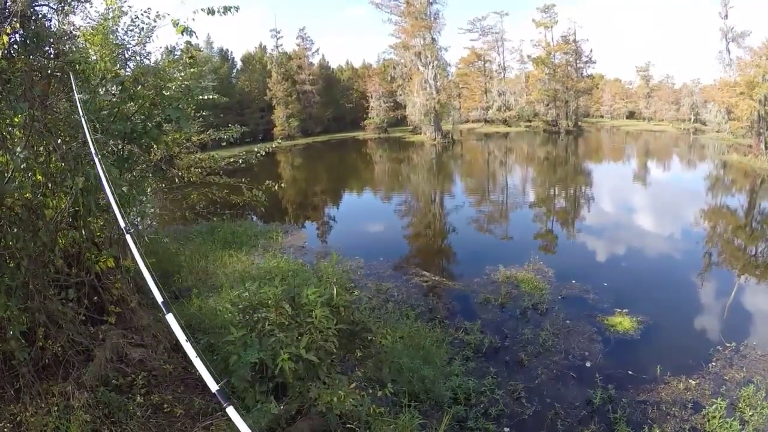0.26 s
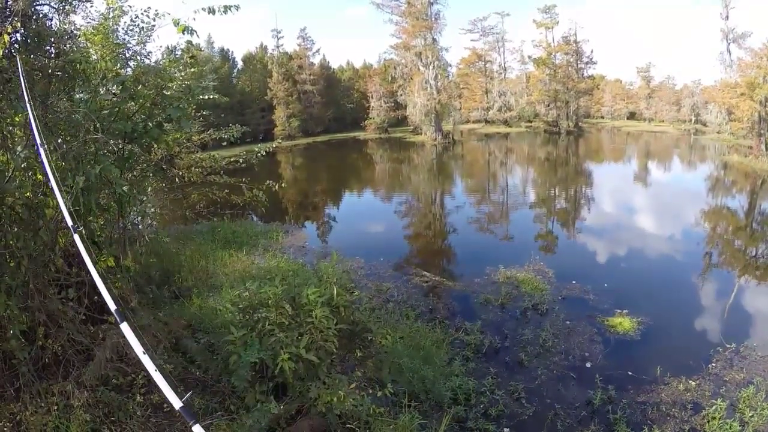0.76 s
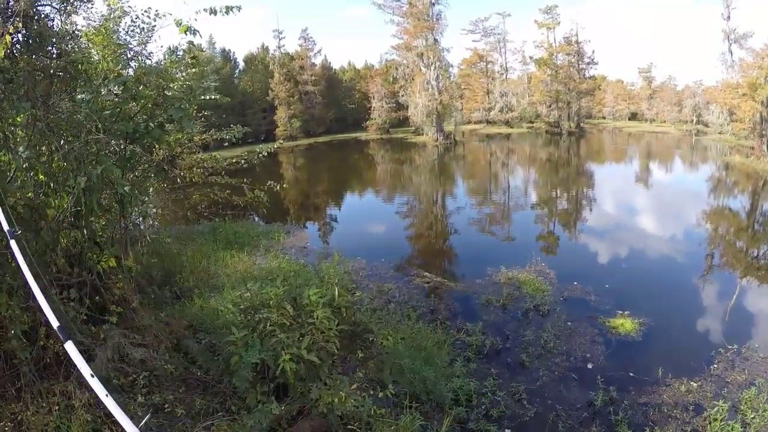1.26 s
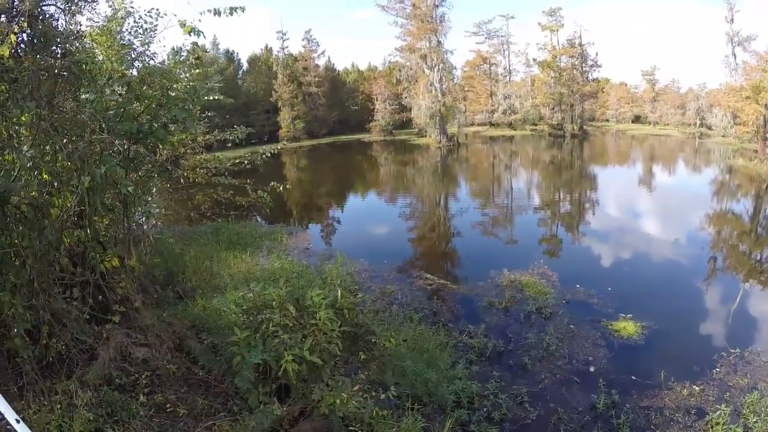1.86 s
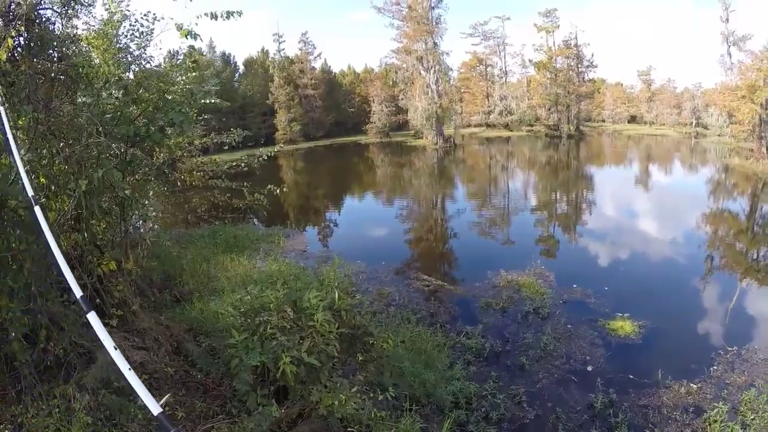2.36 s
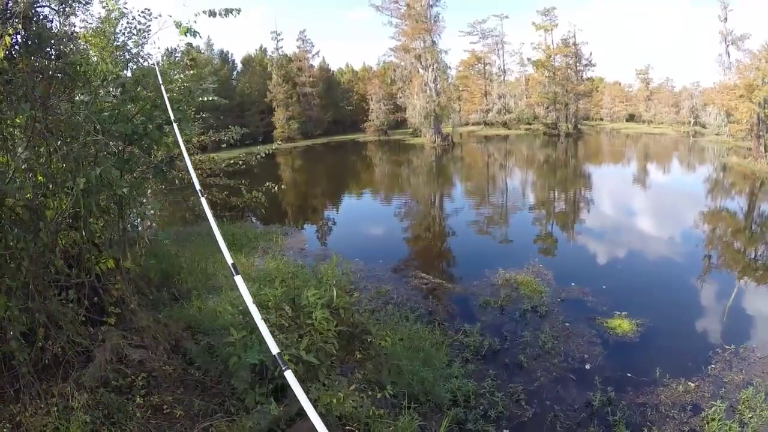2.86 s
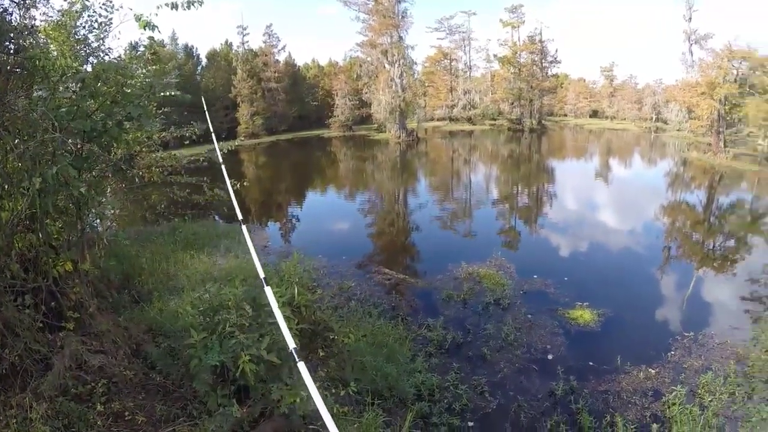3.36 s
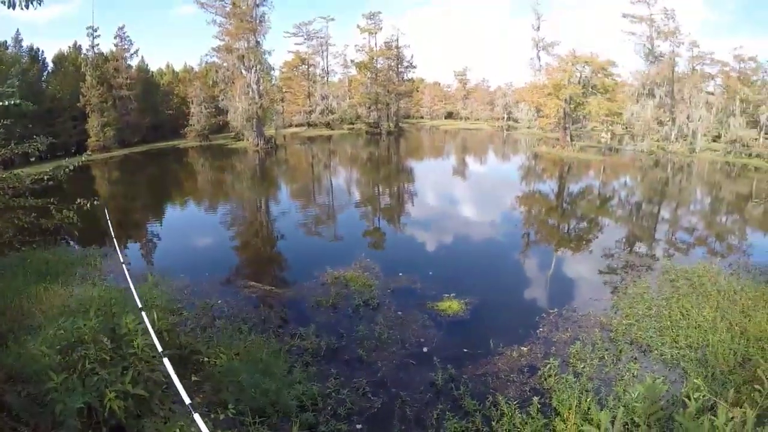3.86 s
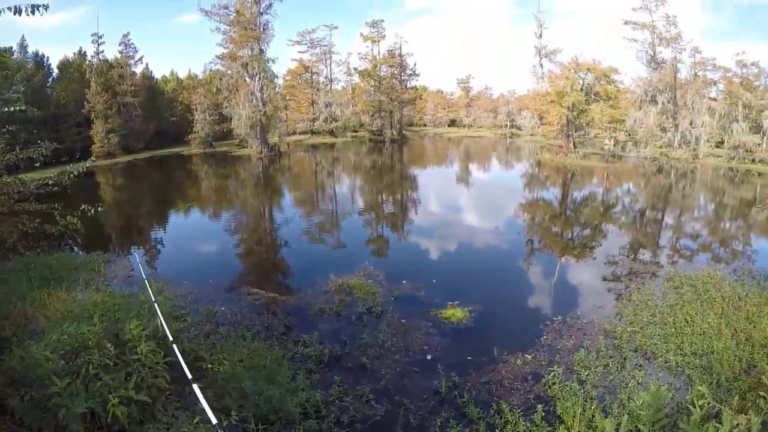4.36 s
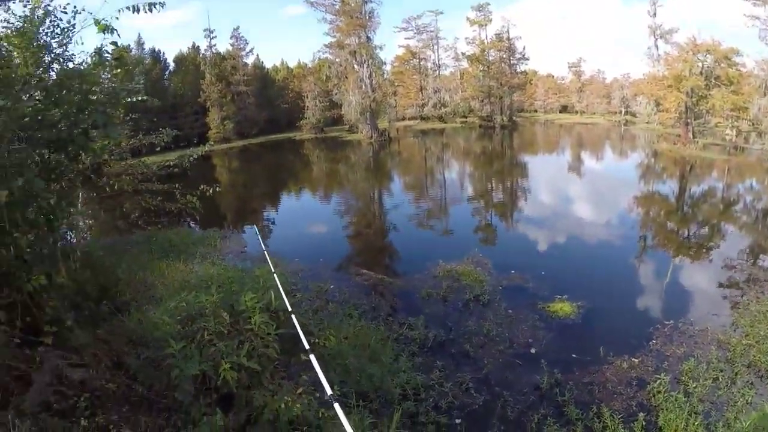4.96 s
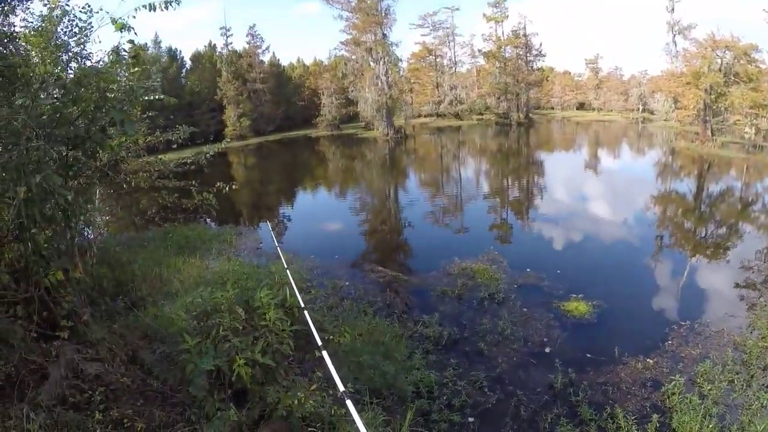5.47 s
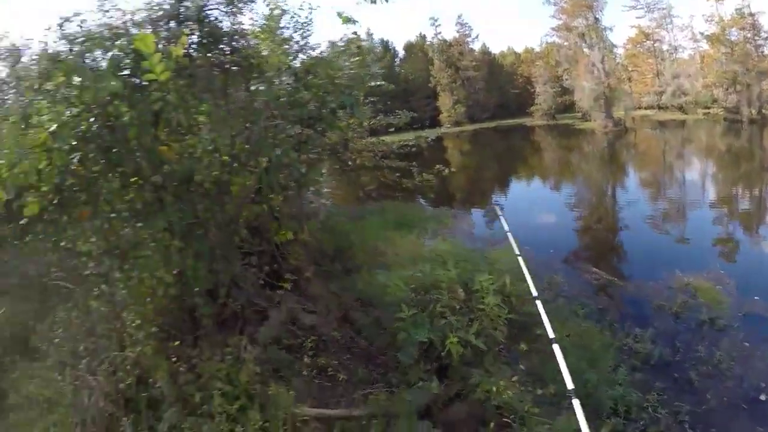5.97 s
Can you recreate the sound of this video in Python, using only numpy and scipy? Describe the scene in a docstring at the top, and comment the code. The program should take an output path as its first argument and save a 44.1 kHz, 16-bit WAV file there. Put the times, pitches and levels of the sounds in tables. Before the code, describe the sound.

Faint, high cricket chirps pulse beside a quiet pond, along with a katydid's thin rasp and a few far bird notes, over steady low rumble and a distant machine hum. Midway, small creaks lead to a sharp, dull knock right at the microphone as an angler's gear bumps it. The insects carry on, and a second, lighter bump comes at the end with a plastic click and a brush of cloth.

```python
"""Low air rumble and a far machine's drone hang over the edge of a still pond.
Crickets chirp in the grass, each chirp a quick run of wing strokes. A meadow katydid rasps its wings
in a high buzz, ticks, then buzzes again, and a far bird's thin notes echo from the trees.
Twice, loud and close, an angler's gear knocks and rubs on the camera case as the rod is swung round."""
import sys
import numpy as np
from scipy import signal
from scipy.fft import rfft, irfft, next_fast_len
from scipy.io import wavfile
from scipy.ndimage import map_coordinates

SR = 44100
rng = np.random.default_rng(int(sys.argv[2]) if len(sys.argv) > 2 else 0)


def unload_audio(sound):
    """Save the sound as a 16-bit wav file, at the path given as the first command line argument."""
    columns = np.transpose(np.atleast_2d(sound))
    # keep every value between -1 and 1, then stretch to whole-number steps
    steps = np.round(np.clip(columns, -1, 1) * 32767)
    wavfile.write(sys.argv[1], SR, steps.astype(np.int16))


N = 273420

# boxy tone of the camera case, knocked or scuffed: (frequency [Hz], relative level [dB])
CASE_COLOUR = [(40, -27), (150, -1.5), (250, -7.5), (350, -0.5), (560, -4), (740, -4.5), (980, -4.5),
               (1250, -11.5), (1500, -5.5), (1750, -9.5), (2200, -27.5), (2800, -20), (3800, -29.5),
               (5400, -30.5), (6300, -59)]


def amp(db):
    """Decibels to gain."""
    return 10 ** (np.asarray(db) / 20)


def unit(x):
    """Scale to rms 1."""
    return x / np.sqrt(np.mean(x ** 2) + 1e-20)


def along(points, hz):
    """Read a curve of (Hz, value) points along a log frequency axis."""
    freqs, values = np.transpose(points)
    return np.interp(np.log(hz + 1), np.log(freqs + 1), values)


def wobble(rate):
    """A smooth random curve, rate knots a second."""
    return map_coordinates(rng.standard_normal(int(N * rate / SR) + 4), [np.arange(N) * rate / SR])


def humps(rows):
    """A gain envelope of bell-shaped swells: (crest [s], spread [s], level [dB])."""
    t = np.arange(N) / SR
    return sum(amp(db) * np.exp(-.5 * ((t - s) / spread) ** 2) for s, spread, db in rows)


def filtered(x, response):
    """Equalise x with a gain given as a function of frequency."""
    size = next_fast_len(N + SR // 2)
    return irfft(rfft(x, size) * response(np.fft.rfftfreq(size, 1 / SR)), size)[:N]


def noise(spectrum):
    """Coloured noise of rms 1."""
    return unit(filtered(rng.standard_normal(N), lambda hz: amp(along(spectrum, hz))))


def causal(gain):
    """The most compact impulse response that has this gain."""
    cepstrum = irfft(np.log(np.maximum(gain, 1e-6)))
    half = len(cepstrum) // 2
    cepstrum[1:half] *= 2
    cepstrum[half + 1:] = 0
    return irfft(np.exp(rfft(cepstrum)))


def add(track, s, sound):
    """Mix a sound in at time s."""
    part = track[max(round(s * SR), 0):][:len(sound)]
    part += sound[:len(part)]


def glide(length, start_hz, end_hz):
    """A tone that swells and fades while its pitch slides."""
    u = np.linspace(0, 1, int(length * SR))
    return np.sin(np.pi * u) * np.sin(2 * np.pi * np.cumsum(start_hz + (end_hz - start_hz) * u) / SR)


def mode(t, hz, db, t60, attack_s=0.0004):
    """One damped resonance, set going by a contact of finite length."""
    return amp(db - 60 * t / t60) * (1 - np.exp(-t / attack_s)) * np.sin(2 * np.pi * hz * t)


def trees(x, t60, wet_db):
    """The sound with its diffuse echo from the trees."""
    t = np.arange(SR) / SR
    tail = rng.standard_normal(SR) * amp(-60 * t / t60)
    return x + amp(wet_db) * signal.fftconvolve(x, tail / np.linalg.norm(tail))[:N]


def air(rumble_db=-40.7, wash_db=-50, swell_rest_db=-75.5, hiss_db=-68.5):
    """The bed: low rumble, a distant wash over the water that swells a little, and a fine even hiss."""
    # tone of each layer: (frequency [Hz], relative level [dB])
    rumble_colour = [(8, -20), (20, -9.5), (32, 2), (48, -2.5), (75, -2.5), (105, -8.5), (140, -19),
                     (220, -32.5), (400, -67)]
    wash_colour = [(100, 1), (220, -1.5), (400, -6), (520, -6), (660, 1.5), (780, 1), (920, -6.5),
                   (1100, -13), (1280, -18), (1600, -20.5), (2100, -27.5), (3500, -35.5), (7000, -66)]
    swell_colour = [(600, -15), (950, -1), (1150, 0.5), (1500, -9), (2200, -21.5), (4000, -51)]
    hiss_colour = [(800, -4), (2500, 1.5), (4800, 0.5), (7000, -3), (9500, -6.5), (12000, -7), (15000, -10)]
    # swells in the wash's upper range: (crest [s], spread [s], level [dB])
    swells = [(.8, 1.02, -64.5), (4.8, .2, -72)]
    rumble = amp(rumble_db + .5 * wobble(6)) * noise(rumble_colour)
    wash = amp(wash_db + 0.65 * wobble(5.6)) * noise(wash_colour)
    swell = np.hypot(amp(swell_rest_db), humps(swells)) * noise(swell_colour)
    return rumble + wash + swell + amp(hiss_db) * noise(hiss_colour)


def machine(shaft_hz=45.95, drift=0.00199, fading_db=3.0, burr_db=-53.5, surge_db=4.5):
    """Far shaft harmonics fade and shift on their way through the air; a low burr surges once."""
    # tones of the drone: (multiple of the shaft speed, rms level [dB])
    harmonics = [(10, -73.5), (12, -67.5), (14, -62), (16, -61), (18, -61), (19, -68), (24, -75.5)]
    # tone of the burr: (frequency [Hz], relative level [dB])
    burr_colour = [(70, -11), (115, -1.5), (140, 7.5), (158, -8.5), (188, -2), (215, -21), (330, -46.5)]
    shaft_phase = 2 * np.pi * shaft_hz * np.cumsum(1 + drift * wobble(1.991)) / SR
    drone = np.zeros(N)
    for order, db in harmonics:
        gain = np.sqrt(2) * amp(db + fading_db * wobble(3.975))
        drone += gain * np.sin(order * shaft_phase + 0.43 * wobble(8) + rng.uniform(0, 2 * np.pi))
    surge = humps([(3.3, 0.55, 0)])
    return drone + amp(burr_db + surge_db * surge) * noise(burr_colour)


def far_crickets(stroke_hz=101, rest_db=-91):
    """Distant crickets blur into a trembling band that comes in waves."""
    # their band: (frequency [Hz], relative level [dB])
    colour = [(6600, -30), (7350, -1), (7600, -4), (8300, 2), (9200, -9), (9800, -35)]
    # their waves: (crest [s], spread [s], level [dB])
    waves = [(.3, .25, -82), (1.25, .35, -81), (5.6, 0.86, -83), (6.125, .025, -68.5)]
    strokes = 1 + np.cos(2 * np.pi * np.cumsum(stroke_hz + 3 * wobble(6)) / SR)
    tremble = unit(strokes * amp(4 * wobble(13)))
    return np.hypot(amp(rest_db), humps(waves)) * tremble * noise(colour)


def bird():
    """Thin slurred notes from across the water; the trees answer the lower ones for longer."""
    # (time [s], length [s], start pitch [Hz], end pitch [Hz], dry level [dB])
    notes = [(.636, .02, 5100, 4440, -64.5), (4.776, 0.032, 4140, 3940, -64),
             (4.782, .035, 5080, 4900, -67), (4.838, .035, 3980, 3700, -66), (4.855, .025, 5080, 4900, -72),
             (4.874, .04, 3500, 3750, -68)]
    out = np.zeros(N)
    for s, length, start_hz, end_hz, db in notes:
        note = np.zeros(N)
        add(note, s, amp(db) * glide(length, start_hz, end_hz))
        out += trees(note, t60=min(1.3 * (4000 / start_hz) ** 3, 2), wet_db=1.5)
    return out


def chirps(near_hz=8600, near_db=-63.5, stray_hz=8200, stray_db=-79):
    """The crickets' cues, no two alike: (time [s], length [s], pitch [Hz], relative level [dB])."""
    # the nearest cricket chirps six times and falls silent: (time [s])
    near_times = [.082, .428, .817, 1.214, 1.581, 1.94]
    # its neighbours keep time in even runs:
    # (start [s], period [s], end [s], chirp length [s], pitch [Hz], relative level [dB])
    runs = [(0.21, .266, 2.45, .062, 8240, -70.7), (2.578, .2397, 4.85, .062, 8270, -72.3),
            (5.052, .255, 5.95, .062, 8250, -70.5), (.38, .334, 1.85, .03, 8430, -74),
            (2.26, .215, 2.8, .03, 8340, -75), (3.155, .247, 4.45, .022, 8340, -73),
            (5.18, .255, 6.05, .03, 8340, -73.5), (.49, .305, 1.55, .06, 7850, -76)]
    # two close crickets overlap: (time [s], length [s], pitch [Hz], relative level [dB])
    close_pair = [(6.065, .052, 7800, -70), (6.112, .062, 8340, -69.5)]
    near = [(s, .062, near_hz, near_db) for s in near_times]
    strays = [(rng.uniform(0, N / SR), .04, stray_hz * rng.normal(1, 0.027), stray_db)
              for _ in range(7)]
    neighbours = [(s, length, hz, db) for first, period, end, length, hz, db in runs
                  for s in np.arange(first, end, period)]
    return [(s, length, hz * rng.normal(1, 0.0047), db + rng.normal(0, .5))
            for s, length, hz, db in near + strays + neighbours + close_pair]


def crickets(stroke_hz=97, arch=0.05, fall=0.12, gain_db=7.5):
    """Each wing stroke is a short tone whose pitch arches, then drops as the scraper slows."""
    out = np.zeros(N)
    u = np.linspace(0, 1, int(.95 * SR / stroke_hz))
    envelope = np.sin(np.pi * u) * (1 - u / 2)
    for s, length, hz, db in chirps():
        for k in range(max(round(length * stroke_hz), 1)):
            pitch = hz * (1.013 + 0.0077 * rng.normal() - arch * (2 * u - 1) ** 2 - fall * u ** 4)
            stroke = envelope * np.sin(2 * np.pi * np.cumsum(pitch) / SR + rng.uniform(0, 2 * np.pi))
            soft_start_db = -3 * (k == 0)
            add(out, s + k / stroke_hz, amp(db + gain_db + soft_start_db + rng.normal(0, 0.81)) * stroke)
    return trees(out, t60=.2, wet_db=-11.0)


def wing_rasp():
    """The katydid's file scraping, heard through the resonances of its wing."""
    # tone of the scrape: (frequency [Hz], relative level [dB])
    colour = [(8000, -45), (9800, -5.5), (11200, 0), (12200, -3.5), (13000, -2), (13700, -5), (15000, 1),
              (16000, -4.5)]
    # the wing's sharp peaks and dips: (centre [Hz], width [Hz], lift [dB])
    wing = [(10830, 110, 7), (11400, 90, 8), (12000, 110, -2), (12000, 80, 2), (12740, 60, -2),
            (13720, 140, 9), (14900, 120, -2)]
    lift_db = lambda hz: sum(db / (1 + (2 * (hz - centre) / width) ** 2) for centre, width, db in wing)
    return unit(filtered(noise(colour), lambda hz: amp(lift_db(hz))))


def katydid(attack_s=.17, release_s=0.15, first_tick_s=2.925, tick_db=-66.5):
    """The wings rasp to and fro in two buzzes and close in single ticks between them."""
    # (start [s], end [s], wing stroke rate [Hz], level [dB])
    buzzes = [(-.5, 2.33, 26.9, -70), (4.05, 6.2, 26.3, -70)]
    # faint extra ticks: (time [s], level [dB])
    stray_ticks = [(2.988, -76), (3.048, -72.5)]
    # tone of a tick: (frequency [Hz], relative level [dB])
    tick_colour = [(7500, -40), (9800, -4), (11400, 8), (13000, 0), (15000, 7), (16000, -2)]
    t = np.arange(N) / SR
    buzz = np.zeros(N)
    for start, end, stroke_hz, db in buzzes:
        attack = 1 - np.exp(-np.maximum(t - start, 0) / attack_s)
        release = np.clip((end - t) / release_s, 0, 1)
        strokes = unit(1 + 0.5 * np.sin(2 * np.pi * stroke_hz * t))
        buzz += amp(db + 1.1 * wobble(stroke_hz)) * attack * release * strokes
    gaps_s = .105 + .113 * .25 ** np.arange(10)  # the ticks quicken to a steady pace
    train = [(s, tick_db + rng.normal(0, .6)) for s in first_tick_s + np.cumsum(gaps_s) - gaps_s]
    ticks = humps([(s, 0.0098, db) for s, db in train + stray_ticks])
    return buzz * wing_rasp() + ticks * noise(tick_colour)


def friction(creak_roughness=0.25):
    """As the angler turns, the camera mount creaks, gear scuffs the case and cloth rubs."""
    # (time [s], length [s], pitch [Hz], level [dB])
    creaks = [(3.284, 0.017, 722, -31.5), (3.39, 0.0196, 764, -37), (3.404, 0.03, 673, -40.5),
              (5.882, 0.014, 655, -32.5)]
    # gear scuffs and cloth strokes: (crest [s], spread [s], level [dB])
    scuffs = [(3.491, 0.0017, -29), (5.8872, 0.005, -35)]
    rubs = [(6.03, 0.03, -58.5), (6.172, 0.014, -58)]
    # tone of the cloth: (frequency [Hz], relative level [dB])
    cloth_colour = [(300, -26), (700, 0), (1200, -1), (1700, 7), (2300, -8), (4400, -11), (6500, -31)]
    rubbing = humps(rubs) * amp(1.8 * wobble(90.4)) * noise(cloth_colour)
    creaking = np.zeros(N)
    for s, length, hz, db in creaks:
        add(creaking, s, amp(db) * glide(length, hz, hz))
    creaking *= 1 + creak_roughness * wobble(400)
    return creaking + humps(scuffs) * noise(CASE_COLOUR) + rubbing


def buckle():
    """A plastic buckle clicks lightly, its few modes dying at once."""
    # (time [s], level [dB])
    clicks = [(6.1012, -35)]
    # (frequency [Hz], relative level [dB], t60 [s])
    modes = [(1460, -7, 0.022), (1680, -1.5, 0.02), (2970, -10, .012), (4230, -17, .01)]
    out = np.zeros(N)
    t = np.arange(SR // 2) / SR
    for s, db in clicks:
        add(out, s, sum(mode(t, hz, db + mode_db, t60) for hz, mode_db, t60 in modes))
    return out


def knocks(ring_hz=1858, ring_t60=0.24):
    """Gear strikes the camera case with a dead thud; one small part rings on."""
    # (time [s], thud peak [dB], treble corner [Hz], ring relative to the thud [dB])
    blows = [(3.48802, -21.5, 3500, -42), (3.48921, -13.2, 3500, -32), (3.4939, -33, 700, -47),
             (3.5072, -28, 300, -45), (5.8823, -30, 4000, -39), (5.888, -31, 4000, -41),
             (5.8904, -40, 4000, -43)]
    # damped modes of the case: (frequency [Hz], level relative to the thud [dB], t60 [s])
    case_modes = [(169, -20.5, 0.048), (370, -24, 0.038), (543, -16.5, 0.04), (752, -9.5, 0.028),
                  (934, -11, 0.016), (1687, -10.5, 0.018), (2370, -28.5, 0.027), (2890, -28.5, 0.026),
                  (4540, -28.5, 0.022), (5420, -26.5, 0.022)]
    out = np.zeros(N)
    t = np.arange(SR // 2) / SR
    hz = np.fft.rfftfreq(len(t), 1 / SR)
    for s, db, corner_hz, ring_db in blows:
        # a softer contact lasts longer and feeds less treble into the case
        thud = causal(amp(along(CASE_COLOUR, hz)) / np.hypot(1, hz / corner_hz))
        body = sum(mode(t, f * rng.normal(1, 0.013), mode_db, t60) / np.hypot(1, f / corner_hz)
                   for f, mode_db, t60 in case_modes)
        ring = mode(t, ring_hz, ring_db, ring_t60)
        add(out, s, amp(db) * (thud / np.abs(thud).max() + body + ring))
    return out


def scene():
    """The pond's bed, its wildlife and the angler's gear at one microphone."""
    bed = air() + machine()
    wildlife = crickets() + far_crickets() + katydid() + bird()
    gear = knocks() + buckle() + friction()
    return (bed + wildlife + gear)[None]


def record(dry):
    """The camera keeps nothing above its band limit."""
    top_hz = 15400
    return filtered(dry[0], lambda hz: hz < top_hz)[None]


dry = scene()
out = record(dry)
unload_audio(out)
```